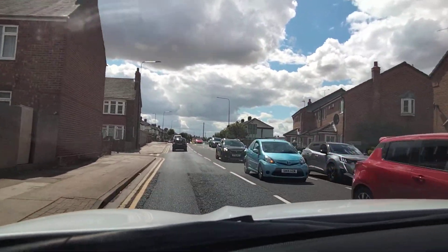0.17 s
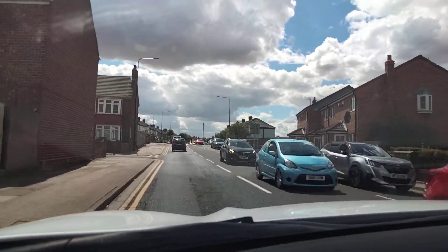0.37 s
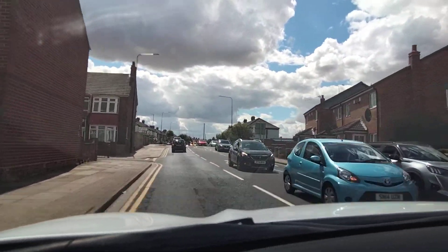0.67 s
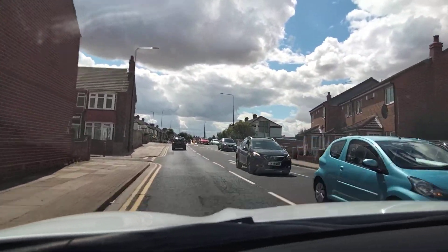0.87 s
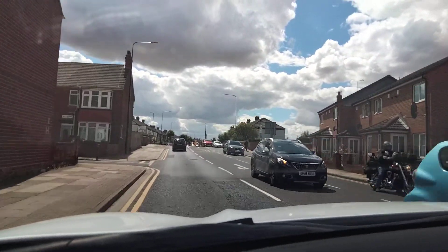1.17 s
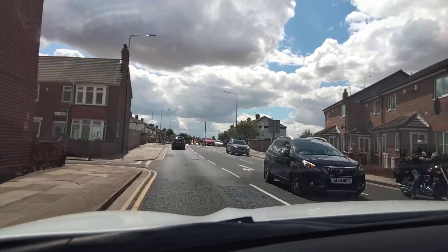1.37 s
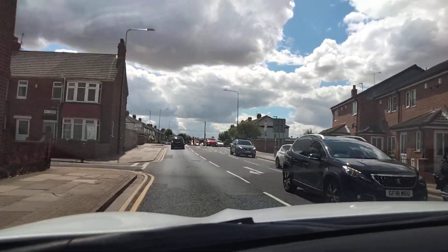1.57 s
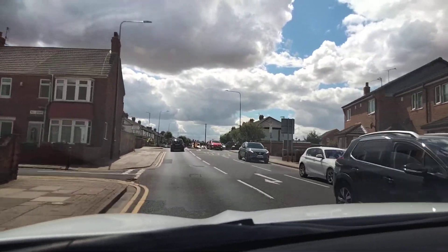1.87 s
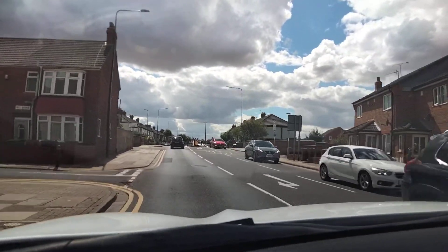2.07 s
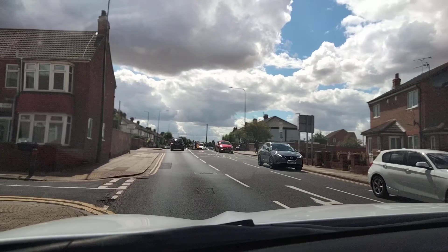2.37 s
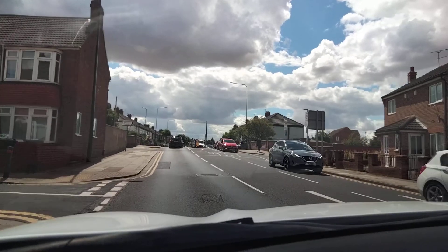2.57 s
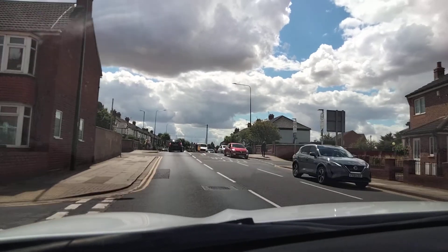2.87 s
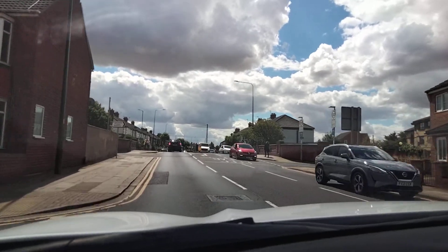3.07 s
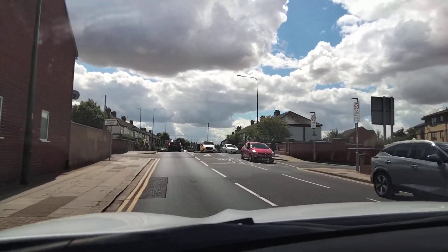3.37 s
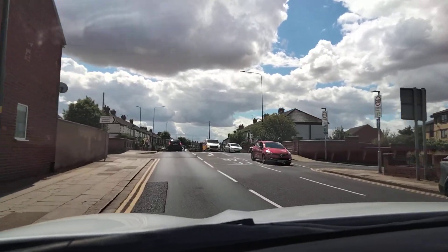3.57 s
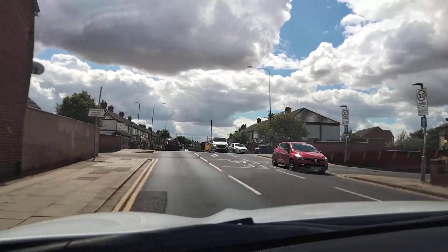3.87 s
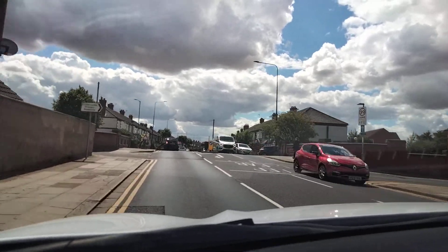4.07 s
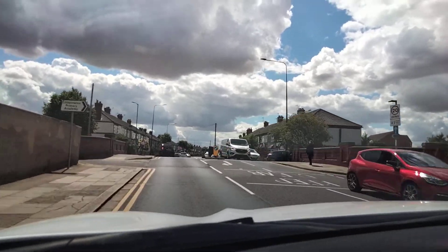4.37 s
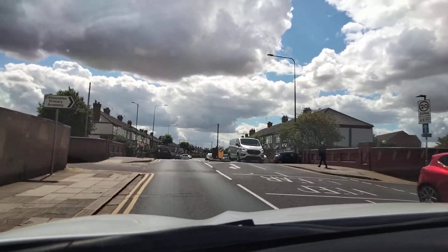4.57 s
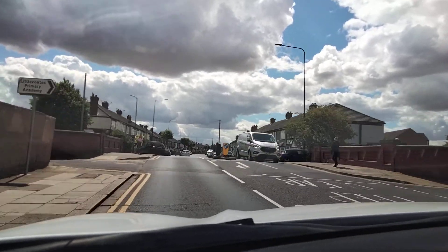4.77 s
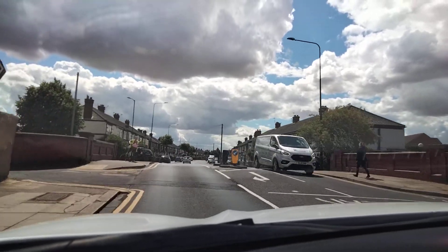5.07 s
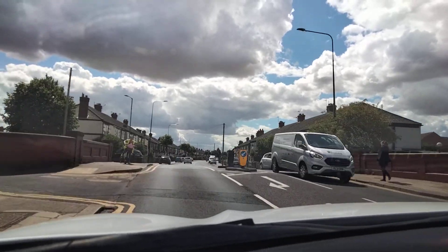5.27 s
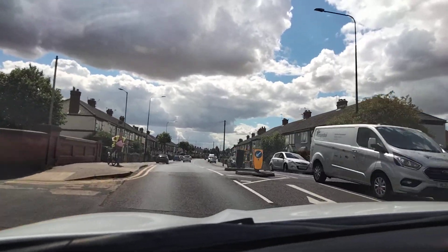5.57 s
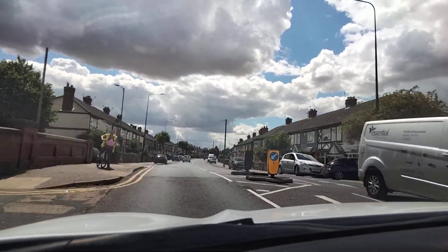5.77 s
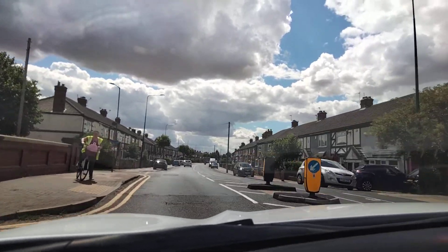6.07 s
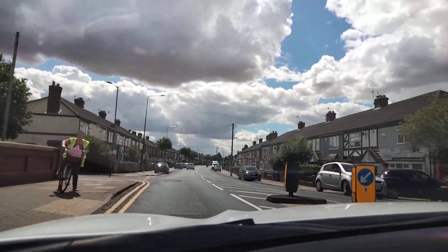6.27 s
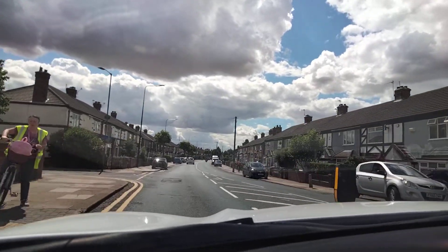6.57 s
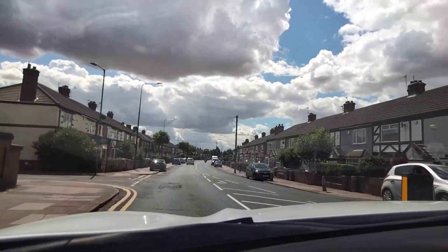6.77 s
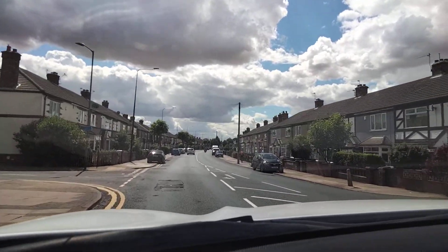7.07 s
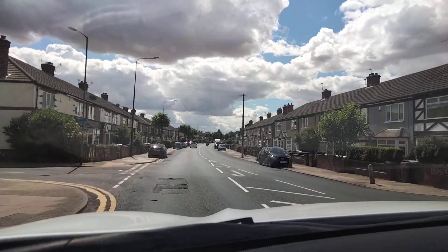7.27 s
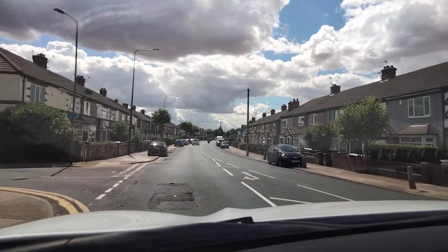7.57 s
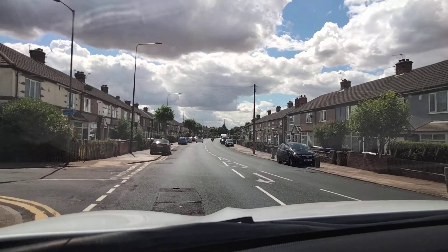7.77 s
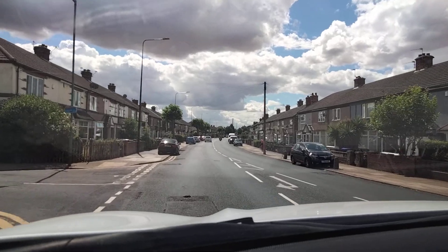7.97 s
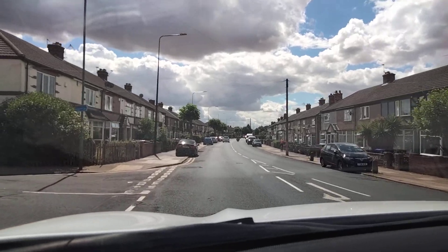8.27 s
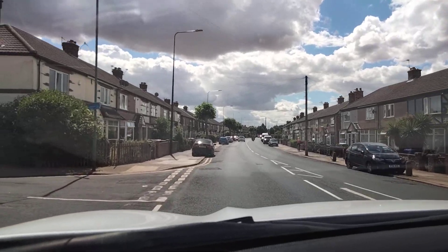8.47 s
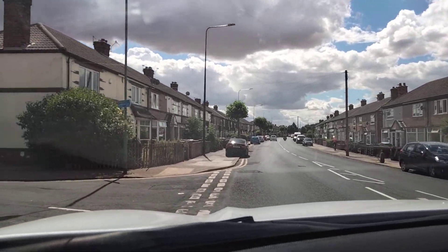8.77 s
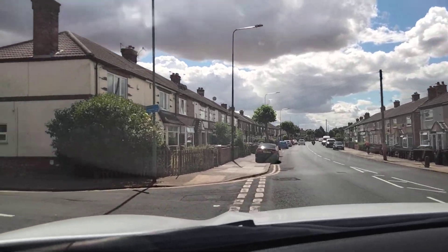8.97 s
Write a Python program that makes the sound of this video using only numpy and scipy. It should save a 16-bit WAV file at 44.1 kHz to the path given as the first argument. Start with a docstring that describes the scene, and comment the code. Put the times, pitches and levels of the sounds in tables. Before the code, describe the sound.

A close microphone inside a car cabin picks up bassy tyre rumble, soft bump shudders, muted engine hum and a very thin hiss. Small dry plastic ticks patter busily through the first half. After a rough patch the indicator relay starts ticking and tocking regularly, continuing to the end. The engine drops lower as the car slows, with sparse creaks, dull knocks, scrapes and sharp snaps on the dashboard.

```python
"""Inside a car rolling along a town street, heard from just behind the windscreen.
The road shakes the body and booms in the cabin: random noise through resonances, over a faint engine
hum of a few sines. Loose plastic close to the microphone ticks, creaks and snaps in filtered bursts,
a thin hiss of coloured noise swells and sinks, louder with the boom, and from halfway the turn
indicator goes tick-tock, its relay ringing in short decaying sines."""
import sys
import numpy as np
from scipy import signal
from scipy.fft import rfft, irfft
from scipy.io import wavfile
from scipy.ndimage import uniform_filter1d

SR = 44100
rng = np.random.default_rng(int(sys.argv[2]) if len(sys.argv) > 2 else 0)


def int16_out(signal):
    """Quantize to a 16-bit WAV file."""
    q = np.round(np.clip(np.atleast_2d(signal).T, -1, 1) * 32767)
    wavfile.write(sys.argv[1], SR, q.astype(np.int16))


N = 402633
T = np.arange(N) / SR

# Spectrum of dry scrapes and of the coarse crackle in a rustle. Each row: frequency in Hz, level in dB.
SCRAPE_COLOUR = [(400, -27), (1200, -4), (2200, -11), (3200, -2.5), (4300, -3), (6000, 2.5), (7200, 2),
                 (9000, 6.5), (12000, -21), (16000, -11)]


def undb(db):
    """Decibels to gain."""
    return 10 ** (np.asarray(db) / 20)


def unit(x):
    """Scale to rms 1."""
    return x / np.sqrt(np.mean(x ** 2))


def smooth_twice(x, size):
    """Two running means in a row."""
    return uniform_filter1d(uniform_filter1d(x, size), size)


def walk(rate):
    """Smoothly wandering random levels, with about rate new values a second; spread near 1."""
    hold = int(SR / rate)
    steps = np.repeat(rng.standard_normal(N // hold + 1), hold)
    return 1.223 * smooth_twice(steps, hold)[:N]


def swell(s, length):
    """A smooth bell-shaped bump in time, highest at s."""
    return np.exp(-.5 * np.minimum(((T - s) / length) ** 2, 60))


def response(colour, size=1024):
    """Causal (minimum-phase) impulse response of unit energy with the given spectrum."""
    hz, db = np.transpose(colour)
    f = np.maximum(np.fft.rfftfreq(size, 1 / SR), 1)
    gain = undb(np.interp(np.log(f), np.log(hz), db))
    cepstrum = irfft(np.log(gain))
    # folding the cepstrum onto positive time makes the response causal
    h = irfft(np.exp(rfft(2 * cepstrum[:size // 2], size)))
    return h / np.sqrt(np.sum(h ** 2))


def through(x, h):
    """Pass a sound through an impulse response."""
    return signal.fftconvolve(x, h)[:len(x)]


def add(out, s, x):
    """Mix a short sound in at time s."""
    i = int(s * SR)
    out[i:i + len(x)] += x[:len(out) - i]


def shaken(modes, even_s):
    """Resonances under random shaking whose strength is even over spans longer than even_s."""
    f = np.maximum(np.fft.rfftfreq(N, 1 / SR), 1)
    power = 0
    for hz, width, db in modes:
        detuning = (f * f - hz * hz) / (f * width)
        power = power + undb(2 * db) / (1 + detuning ** 2) ** 2
    x = irfft(rfft(rng.standard_normal(N)) * np.sqrt(power), N)
    return x / np.sqrt(smooth_twice(x * x, int(even_s * SR)))


def stroke(modes, polarity):
    """One blow on decaying modes; at negative polarity neighbours start opposed, so the ring builds up."""
    t = T[:SR // 6]
    ring = np.zeros(len(t))
    for k, (hz, db, t60) in enumerate(modes):
        ring += polarity ** k * undb(db - 60 * t / t60) * np.sin(2 * np.pi * hz * t)
    ring *= 1 - np.exp(-t / .0008)  # soft onset
    return ring / np.max(np.abs(ring))


def impacts(table, colour, chatter_db, fade_s):
    """A sharp contact rings a small plastic part, which chatters for a moment as it settles."""
    force, t = np.zeros(N), T[:SR // 50]
    for s, db in table:
        chatter = rng.standard_normal(len(t)) * t * np.exp(-t / fade_s)
        chatter /= np.sqrt(np.sum(chatter ** 2))
        blow = (t == 0) + undb(chatter_db) * chatter
        add(force, s, undb(db) * blow)
    return through(force, response(colour))


def slips(table, colour, fade_s, grain_db):
    """Dense runs of uneven micro-contacts that die away; long slips swell, short ones start abruptly."""
    force, t = np.zeros(N), T[:SR // 8]
    for s, db, length, *_ in table:
        size, push = rng.standard_normal((2, len(t)))
        contacts = unit(push * undb(grain_db * size))
        rise = np.minimum(t / (12 * length ** 2), 1)
        fade = np.exp(-np.maximum(t - length, 0) / fade_s)
        add(force, s, contacts * undb(db) * rise * fade)
    return through(force, response(colour))


def ride():
    """Shudder, boom, drone and rush in dB: each surface holds its levels, and bumps swell the first two."""
    # Stretches of road. Each row: start in seconds, then relative levels in dB of the body's shudder,
    # the cabin's boom, the tyres' drone and the tread's rush.
    surfaces = [(0, -25.5, -25, -36.5, -62.5), (3.12, -31, -36.5, -39, -62.5), (3.88, -26, -26, -35, -60),
                (5.0, -28, -35.5, -40, -63), (6.95, -29, -35.5, -41, -68), (8.25, -34, -34.5, -43, -71)]
    # Bumps and rough patches. Each row: centre in seconds, bell width (sigma) in seconds,
    # relative levels in dB of shudder and boom.
    bumps = [(1.708, 0.14, -20, -36), (2.46, 0.19, -33, -24), (2.847, 0.053, -21.5, -39),
             (3.98, 0.034, -40, -14.5), (4.288, 0.095, -17.5, -22.5), (4.525, 0.036, -19, -38),
             (4.74, 0.021, -35, -20), (5.024, 0.084, -20, -43), (5.695, 0.052, -19, -34),
             (6.154, 0.06, -24, -26.5), (6.804, 0.086, -29.5, -27.5), (7.177, 0.18, -21.5, -35.5),
             (7.75, 0.055, -22, -39), (8.876, 0.042, -24.5, -35)]
    crossing_s = 0.3  # one surface gives way to the next
    starts, *columns = np.transpose(surfaces)
    stretch = np.searchsorted(starts[1:], T)
    levels = [uniform_filter1d(c[stretch], int(crossing_s * SR)) for c in columns]
    shudder_db, boom_db, drone_db, rush_db = levels
    shudder, boom = undb(shudder_db), undb(boom_db)
    for s, length, jolt_db, thud_db in bumps:
        bump = swell(s, length)
        shudder = np.hypot(shudder, undb(jolt_db) * bump)
        boom = np.hypot(boom, undb(thud_db) * bump)
    return 20 * np.log10(shudder), 20 * np.log10(boom), drone_db, rush_db


def road(shudder_db, boom_db, drone_db, rush_db):
    """Bumps shudder the body; coarse asphalt booms in the cabin; the tyres drone and the tread rushes on."""
    # Resonances of body, cabin air and tyres. Each row: frequency in Hz, width in Hz, level in dB.
    body_modes = [(20, 10, -4), (31.5, 8, 0), (43, 5, 2)]
    cabin_modes = [(65.5, 14.7, -2), (84.9, 32.6, 1), (123.5, 22.2, -4)]
    tyre_modes = [(180, 25.3, 1), (216.6, 14.7, -6.5), (259, 49, -6.5), (345.4, 61, -17)]
    # Spectrum of the tread's rush. Each row: frequency in Hz, level in dB.
    rush_colour = [(150, -9), (340, 5), (430, 1.5), (560, 1.5), (850, 0.5), (1020, -8), (1300, -11),
                   (1600, -19.5), (1900, -14.5), (2400, -25), (4000, -25.5), (9000, -44)]
    shudder = shaken(body_modes, even_s=0.16) * undb(shudder_db - 0.5)
    boom = shaken(cabin_modes, even_s=0.18) * undb(boom_db - 0.33)
    drone = shaken(tyre_modes, even_s=0.7) * undb(drone_db - 2.5 + 1.33 * walk(11))
    rush_level = undb(rush_db + 5.5 + 1.7 * walk(9) + 2.0 * walk(55))
    rush = through(rng.standard_normal(N), response(rush_colour)) * rush_level
    return shudder + boom + drone + rush


def engine():
    """Four cylinders at low revs, one change up: the bulkhead passes the firing rate's first multiples."""
    # Course of the engine, joined by straight lines. Each row: time in seconds, firing rate in Hz.
    revs = [(0, 53.5), (1.2, 54), (2.6, 52.7), (3.5, 56.3), (4.3, 60), (5.2, 61.7), (6.1, 60), (6.7, 56.5),
            (7.3, 52), (7.7, 38.5), (9.13, 38.3)]
    s, rate = np.transpose(revs)
    hz = np.interp(T, s, rate) * (1 + .004 * walk(5))
    phase = 2 * np.pi * np.cumsum(hz) / SR
    hum = np.zeros(N)
    for k, db in enumerate([-41.5, -43.5, -45.5, -51.0], 1):
        hum += undb(db + 3.9 * walk(3)) * np.sin(k * phase)
    return hum


def panel(rush_db):
    """A light panel patters on its seat, louder as the tread rushes louder, and gives hollow taps."""
    # Taps against the seat. Each row: time in seconds, relative level in dB.
    tap_table = [(0.149, -40), (0.319, -40), (1.374, -40), (1.422, -36), (1.854, -40), (1.894, -37),
                 (2.025, -37.5), (2.194, -37), (2.375, -39), (2.432, -37), (2.518, -36), (2.546, -39),
                 (3.082, -37), (3.179, -41.5), (3.918, -39.5), (3.966, -32), (4.002, -37), (4.235, -39),
                 (4.265, -39)]
    # What a tap rings with. Each row: frequency in Hz, level in dB, 60 dB decay time in seconds.
    tap_modes = [(544.3, 0.5, 0.12), (609, 3, 0.035), (706, -1.5, .03), (1290, -10.5, 0.025)]
    patter_per_s = 130
    touches = (rng.random(N) < patter_per_s / SR) * rng.standard_normal(N)
    ring = stroke(tap_modes, polarity=-1)
    patter_db = -56.0 + 1.92 * (rush_db - rush_db.max()) + 2.8 * walk(12)
    patter = unit(through(touches, ring)) * undb(patter_db)
    taps = np.zeros(N)
    for s, db in tap_table:
        add(taps, s, undb(db + 0.5) * ring)
    return patter + taps


def hiss_levels(boom_db):
    """Levels in dB of the thin hiss, rising with boom and rustles, and of the rustles' coarser crackle."""
    # Spells of rustling. Each row: centre in seconds, relative level in dB, bell width in seconds.
    rustles = [(1.692, -57, 0.07), (2.24, -56.5, 0.027), (5.954, -63, 0.041), (6.964, -58, 0.064),
               (7.337, -63, 0.41), (8.138, -62.5, 0.099), (8.784, -60, 0.14), (9.022, -60.5, 0.45)]
    # -66 dB at a boom of -28 dB, following it by 0.45 dB per dB
    steady = undb(-66 + 0.45 * (boom_db + 28))
    power = sum((undb(db) * swell(s, length)) ** 2 for s, db, length in rustles)
    crackle_under_db = 7.5
    return 10 * np.log10(steady ** 2 + power), 10 * np.log10(power) - crackle_under_db


def grainy_noise(db, colour):
    """Noise of uneven grains, coloured and flickering in level."""
    grains = unit(rng.standard_normal(N) * undb(5.9 * rng.standard_normal(N)))
    flicker_db = 2.9 * walk(140) + 1.3 * walk(9.2)
    return through(grains, response(colour)) * undb(db - 1.5 + flicker_db)


def hiss_and_crackle(hiss_db, crackle_db):
    """A thin hiss swells and sinks, louder with the boom; a coarser crackle comes with each rustle."""
    # Spectrum of the thin hiss. Each row: frequency in Hz, level in dB.
    hiss_colour = [(800, -7), (4200, -5.5), (6200, -1.5), (7200, 0), (8400, 7.5), (10500, -2), (12500, -7),
                   (14700, 3), (15500, -9), (15900, -20)]
    return grainy_noise(hiss_db, hiss_colour) + grainy_noise(crackle_db, SCRAPE_COLOUR)


def squeaks():
    """Trim rubbing on trim sings briefly at an unsteady pitch."""
    # Each row: centre in seconds, pitch in Hz, relative level in dB, bell width in seconds, waver in Hz.
    squeak_table = [(0.734, 2820, -67, .005, 80), (.736, 3320, -66, 0.0064, 110),
                    (1.295, 2560, -81, .044, 13), (2.49, 11800, -67, 0.024, 70),
                    (2.8, 11650, -64, 0.029, 60), (3.23, 11620, -80, .04, 45),
                    (4.954, 4640, -70, .0079, 85), (5.207, 4640, -74, .014, 260),
                    (8.52, 14300, -51.5, 0.0046, 300)]
    waver = walk(900)
    out = np.zeros(N)
    for s, hz, db, length, waver_hz in squeak_table:
        phase = 2 * np.pi * np.cumsum(hz + waver_hz * waver) / SR
        out += undb(db + 7.0) * swell(s, length) * np.sin(phase)
    return out


def slide():
    """Something slides on the dashboard: two broad hissing resonances sink and fade as it slows."""
    start_s, rise_s, fade_s = 8.676, .008, 0.072
    sink_per_s = 1.4  # rate of the exponential fall in pitch
    age = np.maximum(T - start_s, 0)
    sink = np.exp(-sink_per_s * age)
    bands = np.zeros(N)
    for hz in (10000, 15000):
        # a fast random level spreads each tone into a band
        bands += walk(3500) * np.sin(2 * np.pi * np.cumsum(hz * sink) / SR)
    return bands * undb(-49) * np.minimum(age / rise_s, 1) * np.exp(-age / fade_s)


def knocking():
    """Each knock is a short dull scuff, and the spot that is struck rings at its own pitch."""
    # Knocks of the dashboard. Each row: start in seconds, relative level in dB, length in seconds,
    # ring in Hz.
    knocks = [(4.758, -50, 0.016, 580), (7.663, -52.5, 0.0087, 1150), (8.027, -56.5, .006, 717),
              (8.215, -51.5, 0.0033, 514), (8.96, -56, 0.0018, 880)]
    # Spectrum of the scuff. Each row: frequency in Hz, level in dB.
    knock_colour = [(200, -32), (460, 1.5), (700, -0.5), (900, -3.5), (1300, 0), (1800, -9.5), (3500, -16),
                    (6000, -15), (12000, -38)]
    ring_over_db, ring_t60_s = 10, 0.046  # over the level in the table
    out = slips(knocks, knock_colour, fade_s=0.0068, grain_db=6.0) * undb(6.0)
    for s, db, _, hz in knocks:
        add(out, s, undb(db + ring_over_db) * stroke([(hz, 0, ring_t60_s)], polarity=1))
    return out


def clinking():
    """A small hard object jiggles in short runs of contacts."""
    # Each row: start in seconds, level in dB, length in seconds.
    clinks = [(.447, -57.5, 0.0066), (.473, -56, .008), (.812, -62, 0.0088), (.833, -49.5, 0.0058)]
    # Each row: frequency in Hz, level in dB.
    clink_colour = [(700, -28), (1120, 7), (1400, 4), (1750, -13), (2600, -8), (2950, -1), (3300, -15.5),
                    (5000, -19), (6700, -5), (9000, -13)]
    return slips(clinks, clink_colour, fade_s=0.0065, grain_db=4.0)


def scraping():
    """Something shifting on the dashboard scrapes drily in short runs of contacts."""
    # Each row: start in seconds, level in dB, length in seconds.
    scrapes = [(4.602, -48, 0.0051), (7.384, -49, 0.0038), (7.938, -50, 0.0043), (8.004, -58.5, 0.018),
               (8.082, -59, 0.015), (8.135, -39, 0.013), (8.251, -48, 0.0077), (8.298, -55.5, 0.0065)]
    return slips(scrapes, SCRAPE_COLOUR, fade_s=0.0038, grain_db=1.5)


def faint_slips(hiss_db):
    """Small creaks at random moments, stronger while the hiss is louder: rows (s, dB, length s)."""
    per_s, over_hiss_db, length_s = 3.8, 8, 0.0054  # the level is before the creaks' common cut
    moments = (rng.random(int(per_s * N / SR)) * N).astype(int)
    return [(T[i], hiss_db[i] + over_hiss_db, length_s) for i in moments]


def creaking(hiss_db):
    """Trim slips in short creaks, with fainter ones by chance in between."""
    # Each row: start in seconds, relative level in dB, length in seconds.
    creaks = [(.16, -51, 0.023), (1.635, -41.5, 0.0042), (4.603, -38.5, 0.0044), (4.7585, -21, 0.0047),
              (4.768, -46, 0.0049), (4.92, -47.5, 0.039), (5.18, -49, 0.044), (6.918, -41.5, .0038),
              (6.95, -35.5, 0.005), (7.027, -46.5, .006), (7.664, -45.5, 0.012), (8.138, -31, 0.0057),
              (8.146, -47, .004), (8.538, -46, 0.007)]
    # Each row: frequency in Hz, level in dB.
    creak_colour = [(300, -66), (1100, -4.5), (2000, -12.5), (3200, -7), (5000, -5), (6600, -1),
                    (8300, 8.5), (10000, 0.5), (12500, -12), (15000, 4), (16000, -35)]
    table = list(creaks) + faint_slips(hiss_db)
    return slips(table, creak_colour, fade_s=0.006, grain_db=7.0) * undb(-5.0)


def snapping():
    """Hard plastic snaps: single sharp contacts with strong chatter."""
    # Each row: time in seconds, level in dB.
    snaps = [(4.759, -18), (6.9832, 0), (9.0028, -4)]
    # Each row: frequency in Hz, level in dB.
    snap_colour = [(300, -41), (1200, -4.5), (1900, -4.5), (2700, -5.5), (4300, -18), (5500, -6.5),
                   (6500, 8.5), (7700, 5), (9000, 3.5), (12000, -13.5), (15000, -10)]
    return impacts(snaps, snap_colour, chatter_db=-0.5, fade_s=0.0007)


def ticking():
    """Loose plastic ticks about equally hard each time, a little harder after a rest."""
    # Each entry: time in seconds.
    ticks = [.530,.557,.582,.597,.647,.788,.810,.839,.893,.907,.945,.960,1.002,1.021,1.120,1.171,1.194,1.222,1.237,1.509,1.657,1.672,1.767,1.828,1.843,1.891,1.961,1.991,2.076,2.179,2.195,2.229,2.239,2.262,2.281,2.328,2.346,2.374,2.460,2.488,2.504,2.522,2.680,2.721,2.745,2.773,2.787,2.864,2.960,2.977,3.013,3.082,3.152,3.301,3.375,3.449,3.465,3.481,3.678,3.697,3.731,3.746,3.890,3.908,3.921,3.939,3.970,3.985,3.992,4.010,4.059,4.075,4.100,4.112,4.127,4.140,4.157,4.266,4.281,4.295,4.361,4.385,4.474,4.543,4.690,4.845,5.008,5.071,5.098,5.115,5.279,5.295,5.311,5.327,5.342,5.397,5.606,5.652,5.697,5.765,6.100,6.120,6.149,6.227,6.484,6.498,7.230,7.707,7.754,8.035,8.050,8.170,8.194,8.216,8.645,8.660,8.878,8.894]
    # Each row: frequency in Hz, level in dB.
    tick_colour = [(600, -24), (2000, -23.5), (4900, -21), (5600, -12), (7000, -14.5), (8200, 1),
                   (9600, -7.5), (11500, -15.5), (13000, -15), (14900, -8), (16000, -21)]
    rested_db, rested_s = 2.8, .05  # extra level, and the rest that earns it in full
    rest_s = np.diff(ticks, prepend=0)
    chance_db = 1.0 * rng.standard_normal(len(ticks))
    tick_db = -23.0 + rested_db * np.minimum(rest_s / rested_s, 1) + chance_db
    return impacts(zip(ticks, tick_db), tick_colour, chatter_db=-5.5, fade_s=0.00062)


def cabin(x, echo_s, echo_db, tail_db, t60):
    """One reflection off the glass, then the short tail of an upholstered space."""
    t = T[:SR // 5]
    tail = rng.standard_normal(len(t)) * undb(-60 * t / t60) * (t > echo_s)
    h = undb(tail_db) * tail / np.sqrt(np.sum(tail ** 2))
    h[0] += 1  # direct sound
    h[int(echo_s * SR)] += undb(echo_db)
    return through(x, h)


def trim(hiss_db):
    """Loose plastic near the microphone and things on the dashboard, with the cabin's reflections."""
    dashboard = knocking() + clinking() + scraping()
    plastic = creaking(hiss_db) + snapping() + ticking()
    return cabin(dashboard + plastic, echo_s=0.0024, echo_db=-16.5, tail_db=-22.0, t60=0.077)


def indicator():
    """The relay ticks brighter as the lamps light, tocks lower as they go out, and bounces each time alike."""
    # What the relay rings with as it closes and opens. Each row: frequency in Hz, level in dB,
    # 60 dB decay time in seconds.
    on_modes = [(1826, 0, .0176), (1731, -12.5, .085)]
    off_modes = [(1370, 0, .009), (1460, -24, .12), (1850, -10, .013)]
    # Bounces of its armature. Each row: seconds after the first touch, level in dB.
    on_touches = [(0, -43), (.00373, -38), (.00834, -39.5), (.0178, -49.5)]
    off_touches = [(0, -40), (.0053, -42.5), (.0088, -52), (.018, -54)]
    first_s, blink_s, lit_s = 4.691, .7, .35  # first blink, blink to blink, lamps lit
    late_blinks, late_s = (2, 4, 5, 6), .022  # counted from 0: here the tick comes a moment late
    out = np.zeros(N)
    tick = stroke(on_modes, polarity=0.66)
    tock = stroke(off_modes, polarity=0.73)
    for k, s in enumerate(np.arange(first_s, T[-1], blink_s)):
        tick_s = s + late_s * (k in late_blinks)
        for start, ring, touches in ((tick_s, tick, on_touches), (s + lit_s, tock, off_touches)):
            for after_s, db in touches:
                if start + after_s < T[-1]:
                    add(out, start + after_s, undb(db) * ring)
    # the dashboard lets little through above 2200 Hz
    return signal.sosfilt(signal.butter(8, 2200, fs=SR, output="sos"), out)


def scene():
    """Everything as it arrives at the windscreen."""
    shudder_db, boom_db, drone_db, rush_db = ride()
    hiss_db, crackle_db = hiss_levels(boom_db)
    car = road(shudder_db, boom_db, drone_db, rush_db) + engine() + panel(rush_db)
    faint = hiss_and_crackle(hiss_db, crackle_db) + squeaks() + slide()
    return (car + faint + trim(hiss_db) + indicator())[None]


def record(dry):
    """The recorder cuts the top, steeply above 16300 Hz."""
    return signal.sosfilt(signal.ellip(8, .2, 70, 16300, fs=SR, output="sos"), dry)


dry = scene()
out = record(dry)
int16_out(out)
```